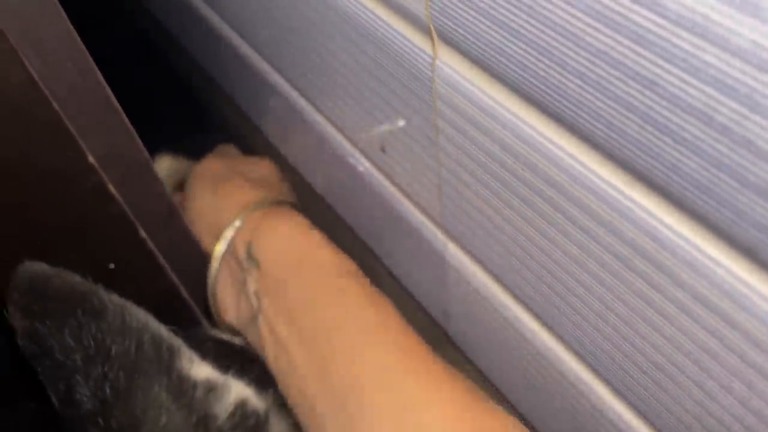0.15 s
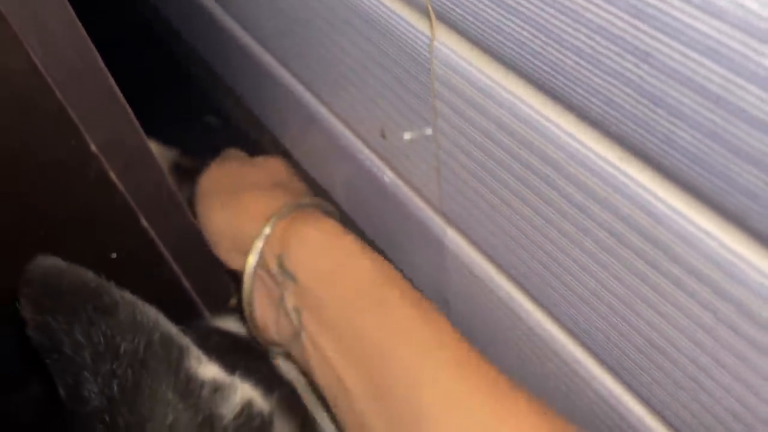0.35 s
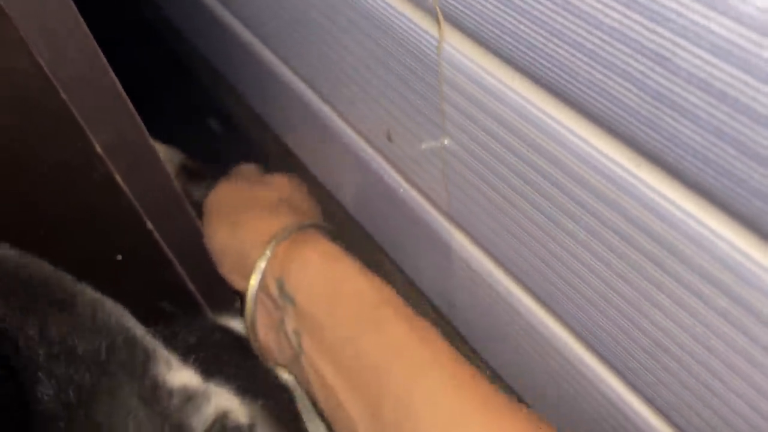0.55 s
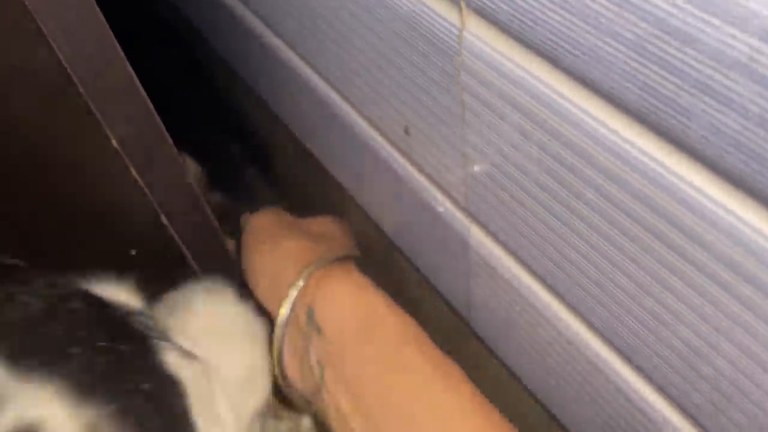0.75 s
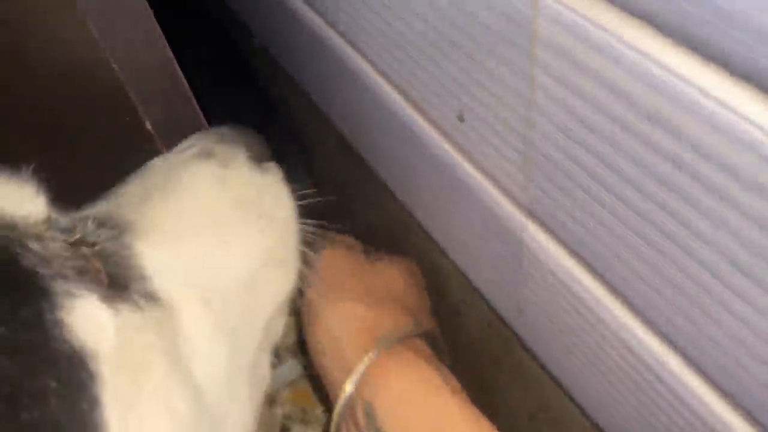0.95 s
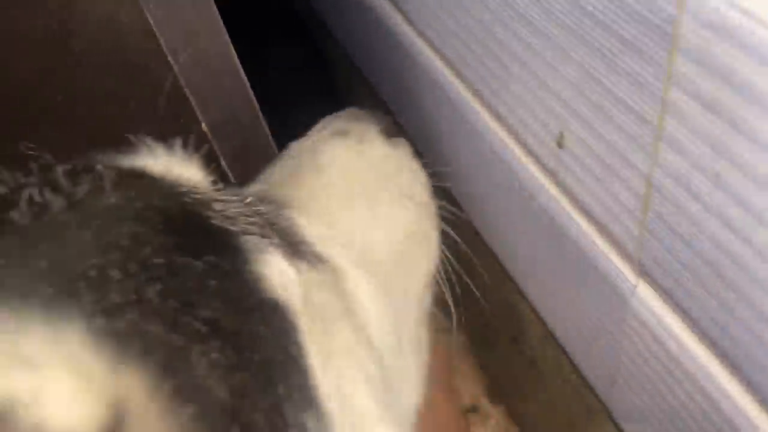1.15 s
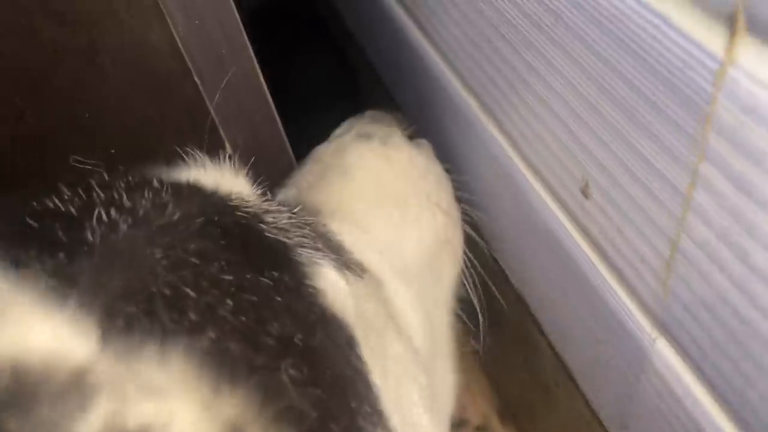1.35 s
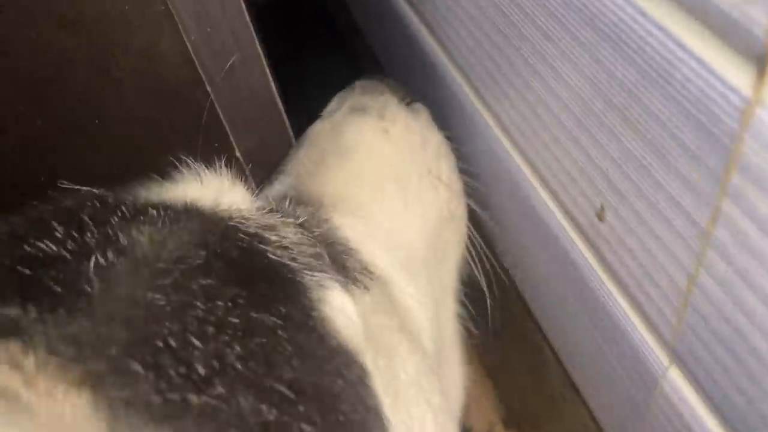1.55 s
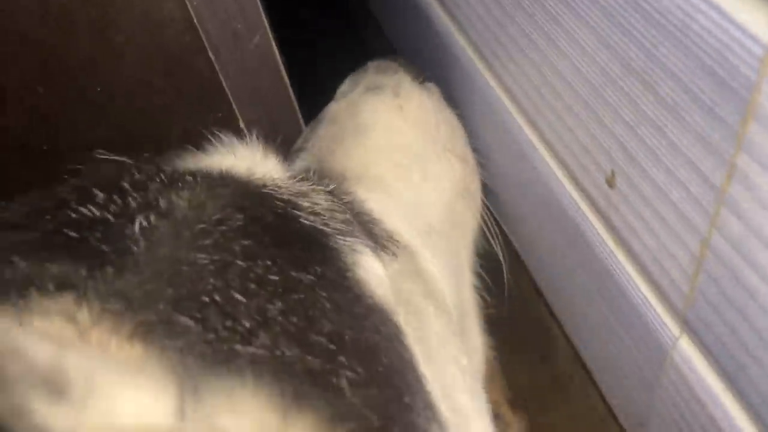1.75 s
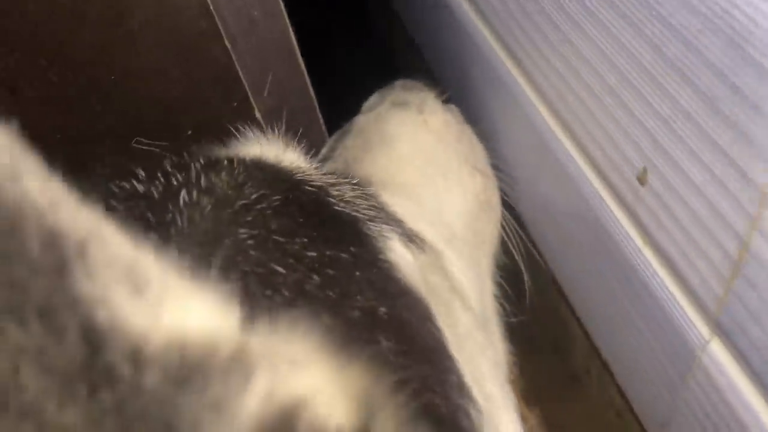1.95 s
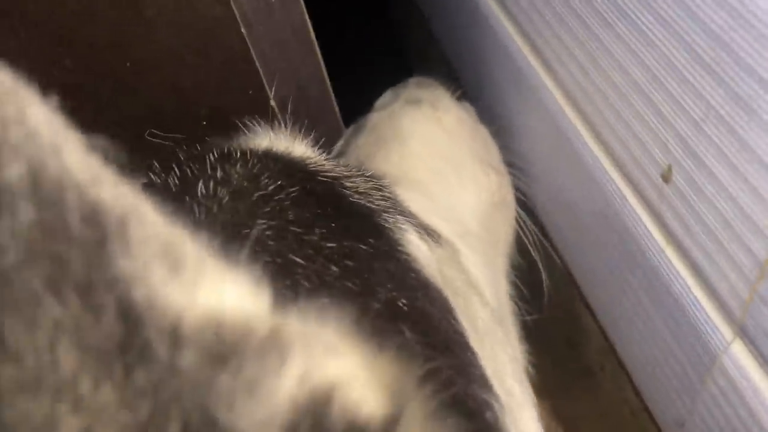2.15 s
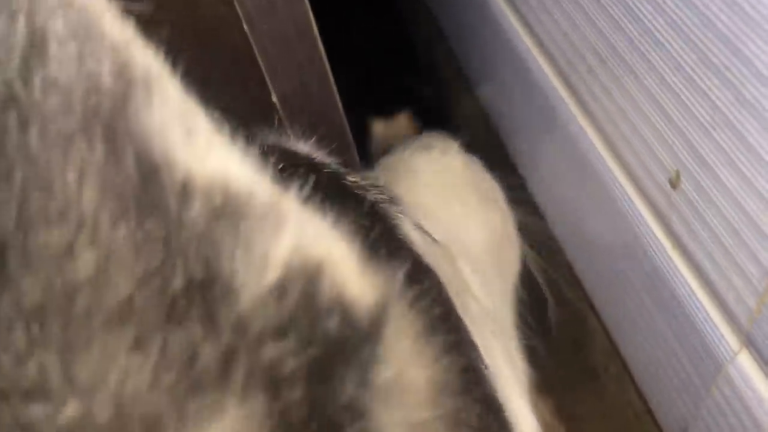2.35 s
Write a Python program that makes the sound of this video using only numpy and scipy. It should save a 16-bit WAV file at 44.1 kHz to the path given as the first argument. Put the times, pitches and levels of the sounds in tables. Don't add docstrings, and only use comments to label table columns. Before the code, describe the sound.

A very young puppy squeals close by in a narrow gap indoors. A rough whimper swells into a clear, piercing cry by 0.3 s, turns raspy and fluttering from 0.85 s, and drops away by 1.3 s. A dull furniture thud lands near 0.45 s and rocks briefly. After a quiet pause, a short yelp at 1.83 s leads to a mew at 2.0 s, fading thinly. Faint hum, rustle and tiny ticks.

```python
import sys
import numpy as np
from scipy import signal
from scipy.fft import rfft, irfft, next_fast_len
from scipy.io import wavfile
from scipy.ndimage import uniform_filter1d, map_coordinates

SR = 44100
rng = np.random.default_rng(int(sys.argv[2]) if len(sys.argv) > 2 else 0)


def wav_out(sig):
    wavfile.write(sys.argv[1], SR, np.round(np.clip(np.atleast_2d(sig).T, -1, 1) * 32767).astype(np.int16))


def invert_db(x):
    u = np.asarray(x, float) / 20
    return 10 ** u


N = 105840


def unit(x):
    return x / np.sqrt(np.mean(x ** 2) + 1e-20)


def along(points, hz):
    f, v = np.transpose(points)
    return np.interp(np.log(hz + 1), np.log(f + 1), v)


def curves(rows):
    s, *cols = np.transpose(sorted(rows))
    return [np.interp(np.arange(N) / SR, s, c) for c in cols]


def wobble(rate_hz):
    points = rng.standard_normal(int(N * rate_hz / SR) + 4)
    return map_coordinates(points, [np.arange(N) * rate_hz / SR])


def crossfade(position, shapes):
    return sum(np.clip(1 - abs(position - k), 0, 1) * shape for k, shape in enumerate(shapes))


def filtered(x, response):
    m = next_fast_len(N + SR // 2)
    return irfft(rfft(x, m) * response(np.fft.rfftfreq(m, 1 / SR)), m)[..., :N]


def resonant(x, peaks):
    def response(f):
        return sum(invert_db(db) * (1j * f * width / (centre ** 2 - f * f + 1j * f * width)) ** 3
                   for centre, width, db in peaks)
    return filtered(x, response)


def rings(hits, partials):
    out = np.zeros(N + SR)
    t = np.arange(SR // 2) / SR
    attack = 1 - np.exp(-t / 0.0012)
    for (s, db, hz, t60), luck in zip(hits, rng.standard_normal((len(hits), 8))):
        ring = 0
        for (ratio, partial_db, share), z in zip(partials, luck):
            decay = invert_db(db + partial_db + 2 * z - 60 * t / (t60 * share))
            ring = ring + decay * np.sin(2 * np.pi * hz * ratio * t)
        out[round(s * SR):][:len(t)] += attack * ring
    return out[:N]


def room():
    # frequency_hz, density_db
    hum = [(15, -58), (25, -70), (59, 3), (329, -12), (525, -9.5), (776, -22.5), (908, -20), (1790, -25.5),
           (12600, -48.5), (16400, -81), (22000, -120)]
    # frequency_hz, likeness_0_to_1
    likeness = [(60, 0.99), (200, 0.94), (580, .1), (1250, 0.078)]
    # time_s, lift_db
    shuffle = [(0, 8.5), (.15, 8), (.3, 6), (.5, 9), (.9, 5), (1.3, -2), (2.4, -1.5)]

    def spread(hz):
        angle = np.arccos(np.clip(along(likeness, hz), -1, 1)) / 2
        return invert_db(along(hum, hz)) * np.array([np.cos(angle), np.sin(angle)])

    mid, side = filtered(rng.standard_normal((2, N)), spread)
    shuffle_db, = curves(shuffle)
    level_db = -48.5 + shuffle_db + 1.2 * wobble(8)
    return unit(np.array([mid + side, mid - side])) * invert_db(level_db)


def cry_gestures():
    # start_s, pitch_hz, level_db, mouth_opening_0_to_1, brightness_db
    onset = [
        (0.01, 633, -29, 0.44, -2),
        (.045, 653, -32, 0.43, -7.5),
        (.06, 669, -36, 0.36, -6.5),
        (0.13, 717.4, -34.5, 0.42, -5.5),
        (0.182, 715, -34, 0.41, -9),
        (.214, 748, -26, 0.44, -12),
        (.23, 778, -24.5, 0.44, -9),
        (0.262, 794.5, -20.5, 0.52, -8),
        (0.304, 826.7, -25, 0.9, 1),
    ]
    clear = [
        (0.33, 837.5, -18, 1, -0.18),
        (0.356, 869.3, -17.5, 0.98, -2),
        (0.391, 862.6, -16, 0.97, -2),
        (0.434, 912, -14.5, 0.85, -2),
        (0.485, 924.8, -20.5, 0.7, -1.6),
        (0.577, 860.7, -23, 0.84, -1.6),
        (0.605, 869.6, -20.5, 0.71, -3.4),
        (0.734, 822.4, -17.5, 0.99, -1.7),
        (0.821, 869.3, -16, 0.9, -0.2),
    ]
    strained = [
        (0.849, 892, -15.5, 0.74, -0.5),
        (0.886, 912.3, -15, 0.79, -1),
        (0.915, 937, -23.5, 0.63, 2),
        (.95, 900.6, -19, 0.74, 2),
        (1.015, 900.7, -22, 0.69, 2.5),
        (1.072, 922.3, -17.5, 0.72, 5.5),
        (1.118, 953, -14.5, 0.78, -6.5),
        (1.18, 944.7, -19, 0.74, -4),
        (1.236, 964, -21, 0.74, -7),
    ]
    fall = [
        (1.258, 898, -23.5, 0.65, -5),
        (1.264, 706.7, -22.5, 0.8, -7.5),
        (1.297, 643.4, -30, 0.48, 0.5),
        (1.321, 571, -44.5, 0.29, 5.5),
        (1.342, 467, -59, 0.022, -22),
    ]
    silent = [
        (1.37, 470, -90, 0, 0),
        (1.79, 520, -90, .5, 0),
    ]
    gasp = [
        (1.808, 573, -48.5, 0.28, 2),
        (1.821, 600, -37.5, 0.27, 0),
    ]
    yelp = [
        (1.834, 713, -21.5, 0.4, -2),
        (1.846, 774.4, -17, 0.79, 2),
        (1.878, 826, -19, 0.93, 8),
        (1.894, 829, -19.5, 0.78, 8.5),
        (1.91, 737, -16.5, 0.96, -3.5),
        (1.932, 719, -18, 0.78, -5.5),
        (1.954, 746, -24.5, 0.44, -11),
        (1.984, 852, -33, 0.4, -9.5),
    ]
    mew = [
        (1.99, 882, -32, 0.42, 1.1),
        (2.016, 901.3, -16.5, 0.63, 1.4),
        (2.048, 878.7, -18.5, 0.57, 2),
        (2.1, 810, -27, 0.49, 3),
        (2.14, 813.6, -28.5, 0.46, 10),
        (2.214, 820.6, -35, 0.44, 18),
        (2.252, 761, -29, 0.42, 16),
        (2.284, 741, -28, 0.45, 0.953),
        (2.31, 693, -31.5, 0.45, 3),
    ]
    moan = [
        (2.331, 630, -38, .3, 1.8),
        (2.353, 579, -40, 0.098, 7.4),
        (2.4, 555, -34.5, 0.11, 17),
    ]
    return curves(onset + clear + strained + fall + silent + gasp + yelp + mew + moan)


def vocal_folds(pitch):
    # time_s, flutter_depth, chaos_0_to_1, slip_share (tone sliding from second harmonic to third)
    roughness = [(0, 0, .16, 0), (.05, .2, .18, 0), (.07, .2, .12, 0), (.13, .1, .1, 0), (.24, 0, .03, 0),
                 (.3, 0, .007, 0), (.815, 0, .005, 0), (.84, .3, .22, 0), (.855, .15, .1, 0),
                 (.87, .4, .18, 0), (.89, .9, .16, .1), (.905, .5, .42, .3), (.94, .5, .42, .2),
                 (.945, 0, .07, 0), (.961, 0, .07, 0), (.966, .5, .42, .2), (1.0, .5, .35, .4),
                 (1.045, .5, .3, .5), (1.055, .1, .14, .25), (1.08, .1, .16, .25), (1.09, .35, .2, .4),
                 (1.115, .15, .2, .4), (1.125, .2, .32, 1), (1.2, .2, .4, 1.1), (1.255, .15, .42, 1.3),
                 (1.268, 0, .04, 0), (1.8, 0, .12, 0), (1.835, 0, .05, 0), (1.9, 0, .09, 0),
                 (2.0, 0, .012, 0)]
    flutter, chaos, slip_share = curves(roughness)
    flutter = flutter * invert_db(3 * wobble(60))
    doubled = 1.32 * np.clip((0.14 - np.arange(N) / SR) / 0.021, 0, 1)

    phase = 2 * np.pi * np.cumsum(pitch) / SR
    flutter_hz, beat_hz, chaos_hz, chaos_bend = 290, 110, 140, 1.4
    flutter_phase = 2 * np.pi * np.cumsum(flutter_hz * (1 + 0.12 * wobble(25))) / SR
    bent = phase - 0.35 * flutter * np.sin(flutter_phase) + chaos_bend * chaos * wobble(chaos_hz)
    size = 1 + doubled * np.cos(phase / 2) + flutter * np.cos(flutter_phase) + chaos * wobble(chaos_hz)
    pulses = size * sum(np.cos(k * bent) * (k * pitch < 14000) for k in range(1, 24))

    climb = np.cumsum(beat_hz * (1 + 0.4 * wobble(30))) / SR % 1
    slip = bent + phase + 2 * np.pi * np.cumsum(pitch * climb) / SR
    slipping = invert_db(-1) * (np.cos(slip) + invert_db(-3) * np.cos(2 * slip))
    pulses = pulses + slip_share * slipping
    pulses = pulses + 1.7 * chaos * (1 + np.cos(bent)) * rng.standard_normal(N)

    fundamental = invert_db(-8 * slip_share) * np.cos(phase + chaos_bend * chaos * wobble(chaos_hz))
    fundamental = fundamental * (1 + chaos * wobble(450))
    return pulses, fundamental


def mouth_cavity(pulses, opening):
    # centre_hz, width_hz, level_db
    shut = [(1257, 1070, 8), (2150, 220, 9), (3930, 310, -13)]
    narrow = [(2275, 712, 2), (3505, 510, -24)]
    wide = [(1815, 622, -0.0024), (2766, 600, 0.66)]
    gape = [(2020, 1000, 1), (2960, 590, 1), (4830, 1700, -12)]
    first_cry = np.arange(N) / SR < 1.79
    widest = np.where(first_cry, resonant(pulses, wide), resonant(pulses, gape))
    shapes = [resonant(pulses, shut), resonant(pulses, narrow), widest]
    return crossfade(2 * np.clip(opening, 0, 1), shapes)


def head_cavity(pulses):
    # centre_hz, width_hz, level_db
    tucked = [(3560, 530, -26), (5150, 810, -20), (6520, 1800, -13), (9520, 1800, -16.5)]
    raised = [(4055, 860, -19.5), (5080, 2470, -18), (9200, 1000, -23), (10400, 1100, -26.5)]
    strained = [(3900, 400, -29), (4750, 650, -14), (5550, 520, -16), (9200, 1300, -19), (10800, 1200, -25)]
    turned = [(3980, 330, -21), (4950, 1100, -15.5), (6500, 790, -18.5), (10160, 2200, -25.5)]
    sinking = [(3240, 570, -11.5), (4340, 890, -11), (4860, 700, -12), (6550, 490, -26.5),
               (10500, 2800, -29.5)]
    # time_s, head_shape (0 tucked, 1 raised, 2 strained, 3 turned, 4 sinking; 5 mutes them all)
    posture = [(.22, 0), (.32, 0.5), (.8, 2), (.86, 0.5), (1.5, 5), (1.6, 2.5), (2.05, 3), (2.14, 4.5)]
    heads = [tucked, raised, strained, turned, sinking]
    return crossfade(curves(posture)[0], [resonant(pulses, head) for head in heads])


def puppy():
    # centre_hz, width_hz, level_db
    chest = [(928, 540, -23.5)]
    pitch, level_db, opening, bright_db = cry_gestures()
    pitch = uniform_filter1d(pitch, size=400) * (1 + 0.004 * wobble(25.04))
    pulses, fundamental = vocal_folds(pitch)
    voice = mouth_cavity(pulses, opening) + resonant(fundamental, chest)
    voice = voice + invert_db(bright_db) * head_cavity(pulses)
    steady = voice / np.sqrt(np.abs(uniform_filter1d(voice ** 2, size=1300)) + 1e-9)
    return steady * invert_db(uniform_filter1d(level_db, size=200))


def gap(x):
    # delay_ms, gain
    walls_before = [
        [(0, 0.34), (.35, 0.38), (.9, -0.65), (1.7, 0.14), (3.1, 0.3)],
        [(.25, 1.253), (.55, -0.55), (1.2, 0.98), (2.3, 0.14), (3.7, 0.12)],
    ]
    walls_after = [
        [(.2, -0.63), (.45, -0.65), (.8, -0.037), (1.5, 0.98), (2.9, 0.63)],
        [(0, 1.67), (.3, 0.026), (1.0, 0.069), (2.0, 0.24), (3.5, 0.3)],
    ]
    # time_s, share of the turned walls
    turning = [(0, 0.12), (1.0, 0.017), (1.3, 0.13), (1.8, 0.34), (2.4, 0.56)]
    # time_s, level_db nearer the left port
    lean = [(0, 4), (.18, -0.5), (.3, 4), (.5, -2), (.7, 2), (1, 2), (1.1, 0), (1.2, 1.5), (1.8, -1),
            (2.2, -1), (2.3, -1)]

    def combed(ports):
        def echoes(f):
            return np.array([sum(gain * np.exp(-2j * np.pi * f * ms / 1000) for ms, gain in port)
                             for port in ports])
        return filtered(x, echoes)

    turn = np.clip(curves(turning)[0], 0, 1)
    near = (1 - turn) * combed(walls_before) + turn * combed(walls_after)
    t = np.arange(SR // 3) / SR
    tail = rng.standard_normal((2, len(t))) * invert_db(-60 * t / 0.13)
    far = signal.fftconvolve(x[None], tail / np.linalg.norm(tail[0]), axes=1)[:, :N]
    return (near + invert_db(-11) * far) * invert_db(np.outer([1, -1], curves(lean)[0]))


def furniture():
    # start_s, level_db, pitch_hz, t60_s
    bumps = [
        (.09, -33.5, 73.3, 0.21),
        (.33, -37, 102, 0.33),
        (.443, -8.5, 146, 0.082),
        (.455, -5.5, 124.8, 0.17),
        (.47, -5, 150, 0.056),
        (.503, -13.5, 98.1, 0.33),
        (.555, -22, 114.2, 0.32),
        (.63, -30, 120.6, 0.58),
        (.71, -19.5, 95.4, 0.058),
        (.755, -26, 58, 0.35),
    ]
    # ratio, level_db, t60_share
    panel = [(1, 2, 0.92), (1.7, -4.5, 0.87), (2.3, -5, 0.49), (3.6, -12.5, 0.62), (5.1, -10.5, 0.13)]
    left = rings(bumps, panel)
    right = filtered(left, lambda f: invert_db(-1.0) * np.exp(-2j * np.pi * f * 0.00011))
    return np.array([left, right])


def ticks():
    # start_s, level_db, pitch_hz, t60_s
    contacts = [
        (1.788, -41.5, 995, 0.13),
        (1.79, -46.5, 2250, 0.06),
        (2.318, -29, 4733, 0.019),
        (2.319, -29, 6500, 0.0078),
    ]
    return rings(contacts, [(1, 4.5, 0.65), (1.3, 2.5, 0.56)])


def scene():
    return gap(puppy() + ticks()) + furniture() + room()


def band_limit(x):
    return signal.sosfilt(signal.butter(12, 12730, fs=SR, output="sos"), x)


def record(dry):
    low_hz, top_hz, notch_hz, notch_width_hz = 45, 11800, 7900, 1900

    def microphone(f):
        bass_cut = (1j * f / (low_hz + 1j * f)) ** 3
        top_cut = 1 / np.sqrt(1 + (f / top_hz) ** 20)
        band = 1j * f * notch_width_hz
        dip = 1 - 0.93 * band / (notch_hz ** 2 - f * f + band)
        return bass_cut * top_cut * dip

    return band_limit(filtered(dry, microphone))


dry = scene()
out = record(dry)
wav_out(out)
```